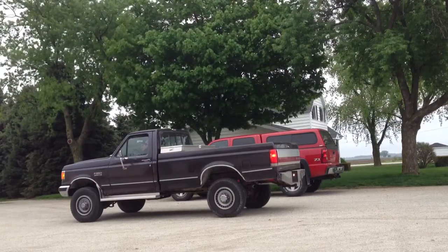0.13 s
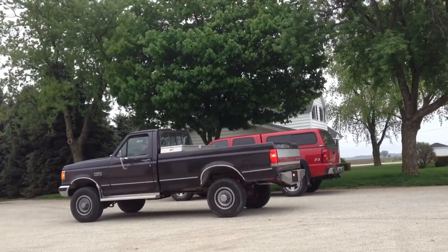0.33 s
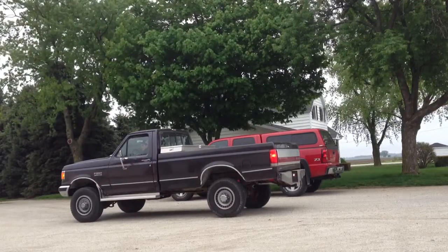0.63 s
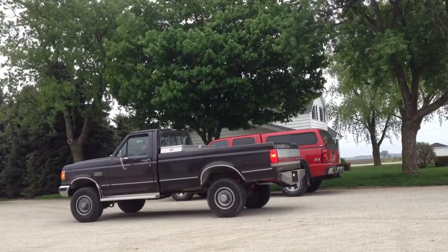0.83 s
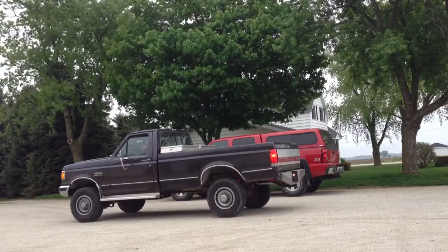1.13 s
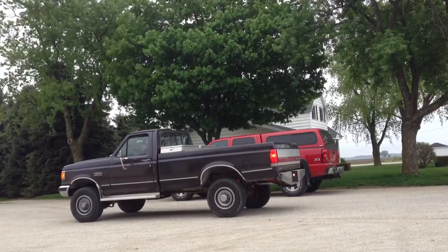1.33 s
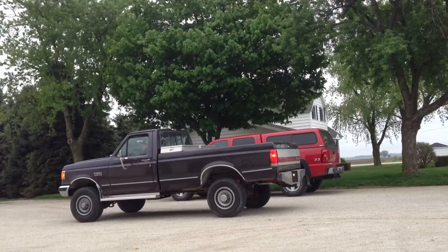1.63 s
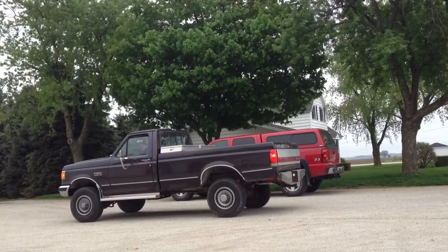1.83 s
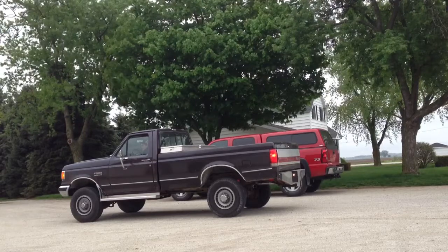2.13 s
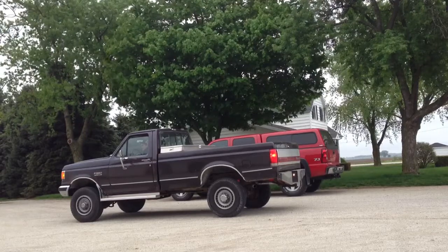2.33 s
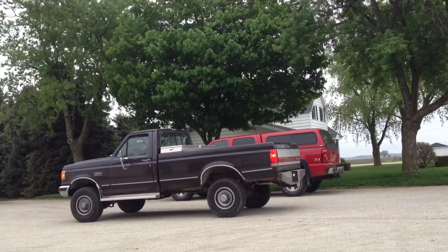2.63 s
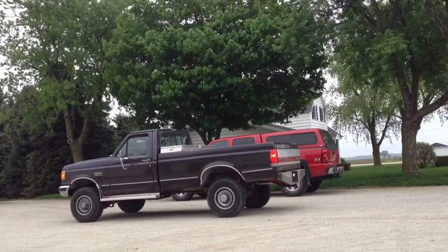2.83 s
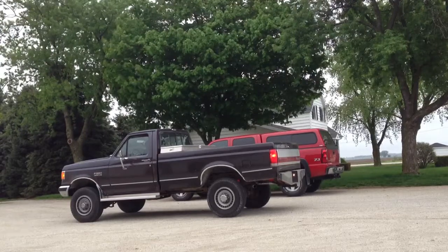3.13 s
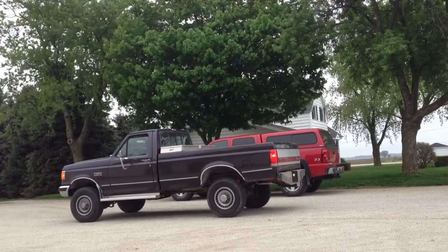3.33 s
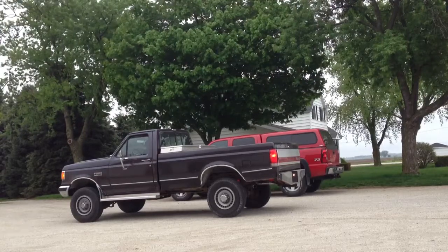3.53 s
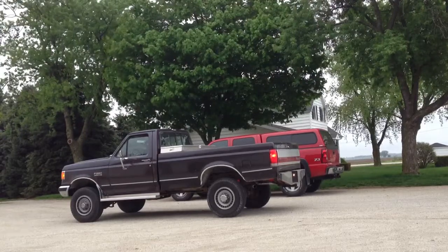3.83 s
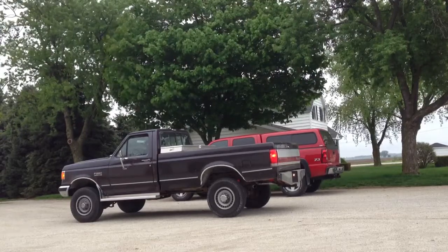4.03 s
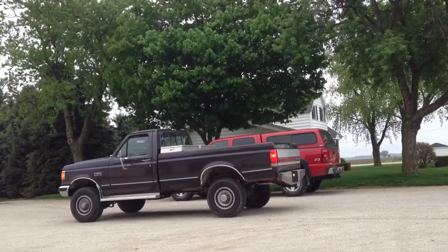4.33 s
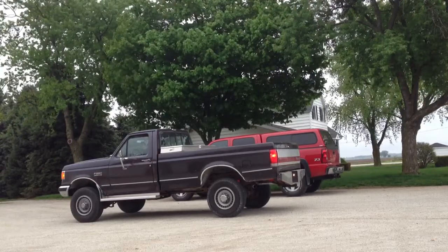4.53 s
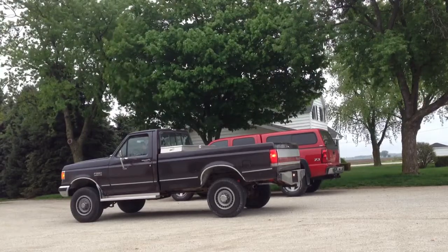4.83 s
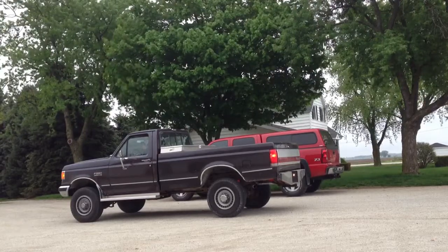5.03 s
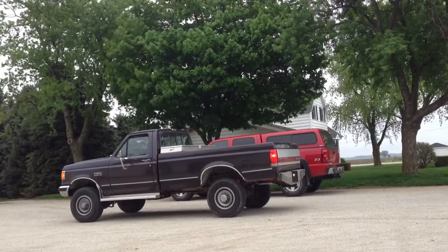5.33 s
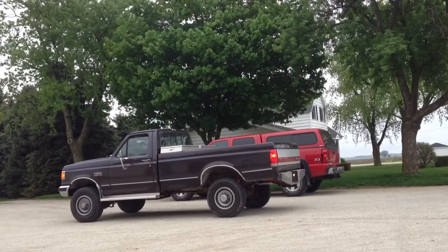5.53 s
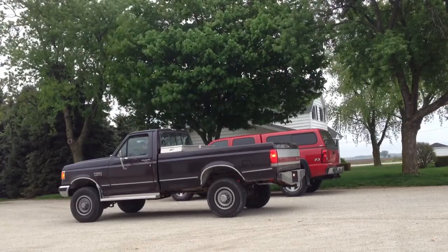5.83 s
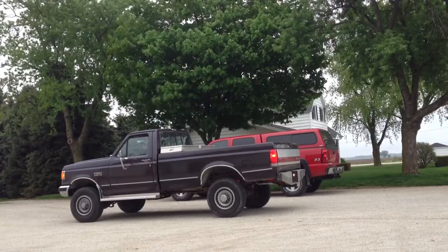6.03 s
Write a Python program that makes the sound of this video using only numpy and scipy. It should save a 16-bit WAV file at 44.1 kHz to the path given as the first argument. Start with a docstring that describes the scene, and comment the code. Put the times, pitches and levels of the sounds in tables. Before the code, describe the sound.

Outdoors on a gravel drive, a parked pickup's V8 with unmuffled twin pipes starts in a rough, lumpy idle and is revved slowly upward. The thumps merge into a humming, barking roar with a tearing rasp at full throttle. It then runs down with rapid crackles and pops, sinking to a weak, sputtering idle before two abrupt blips. The microphone squashes the peaks; trees and a house return faint scatter.

```python
"""A parked pickup's V8 with open dual pipes idles unevenly and is revved slowly; each firing thumps through its pipe.
Then it is floored: low lines hum with the speed and wide throttle adds a tearing rasp.
As it runs down, the pipes crackle and sputter, and late weak firings spit; two blips with a squeak end it.
Throughout, metal ticks, air hisses and a low rumble lies beneath; trees and a house answer faintly.
The microphone's limiter holds the peaks."""
import sys
import numpy as np
from scipy import signal
from scipy.fft import rfft, irfft, next_fast_len
from scipy.io import wavfile
from scipy.ndimage import uniform_filter1d, minimum_filter1d, map_coordinates

SR = 44100
rng = np.random.default_rng(int(sys.argv[2]) if len(sys.argv) > 2 else 0)


def to_wav(s):
    """Save 16-bit WAV."""
    ch = np.atleast_2d(s).T  # columns
    pcm = np.round(np.clip(ch, -1, 1) * 32767)  # PCM
    wavfile.write(sys.argv[1], SR, pcm.astype(np.int16))


N = 273420

# engine speed: (time [s], four-stroke cycles per second [Hz])
SPEED = [(0, 8.23), (0.55, 10.17), (1.3, 14.11), (1.8, 17.47), (2.25, 20.01), (2.44, 22.5), (2.56, 26.7),
         (2.69, 26.71), (2.95, 23.9), (3.3, 20.7), (3.75, 16.72), (4.4, 11.75), (5.53, 6.94), (5.83, 16.94),
         (6.06, 17.58), (6.2, 19.36)]
# how unevenly the fuel burns: (time [s], unevenness [0-1])
UNEVEN = [(0, 0.76), (.9, 0.5), (1.4, 0.25), (2.2, 0.25), (2.7, 0.35), (3.4, 0.5), (4.3, 0.62), (5.5, 0.7),
          (5.62, 0.5), (5.8, 0.45), (6.0, 0.65), (6.2, 0.6)]
# how hard the engine fires: (time [s], thump level before surges [dB])
EFFORT = [(0.0, -29), (0.17, -25.5), (0.59, -22.5), (0.82, -21), (1.1, -18), (1.33, -15), (1.43, -13.5),
          (1.59, -14), (2.02, -13), (2.07, -15.5), (2.4, -13), (2.56, -14.5), (2.95, -21.5), (4.13, -21),
          (4.85, -24.5), (5.28, -28.5), (5.49, -32.5), (5.61, -17.5), (5.85, -15), (5.99, -27), (6.04, -22),
          (6.09, -20), (6.2, -11)]
CRUISE_DB = -18  # the effort at which the bark, light rasp and fan have their set levels
# the pipe of each cylinder, in firing order: 0 or 1
BANK = (0, 1, 1, 0, 1, 0, 0, 1)
# colour of the thump: (frequency [Hz], filter gain [dB])
THUMP_COLOUR = [(25, -39), (60, -32), (85, -23), (110, -6.5), (140, -1), (200, -1.5), (260, -1.5),
                (320, -2), (380, -11.5), (480, -9.5), (700, -28), (1500, -60), (6000, -100)]
# colour of the bark, between thump and rasp: (frequency [Hz], filter gain [dB])
BARK_COLOUR = [(200, -31.5), (400, 4.5), (500, 0), (700, -3), (850, -7), (1100, -8), (1600, -17.5),
               (2500, -15), (8000, -95)]
# colour of bangs and spits: (frequency [Hz], filter gain [dB])
BANG_COLOUR = [(100, -11), (1000, -2), (1800, -6), (2600, -1), (3900, 1), (5300, -1), (6500, -.5),
               (8200, -10), (10700, -13.5), (15500, -28)]


def amp(db):
    """Decibels to gain."""
    return 10 ** (np.asarray(db) / 20)


def unit(x):
    """x at rms 1."""
    return x / np.sqrt(np.mean(x ** 2) + 1e-20)


def steady(x, size=8001):
    """x with its slow level held near rms 1."""
    power = uniform_filter1d(uniform_filter1d(x * x, size), size // 2)
    return x / np.sqrt(np.abs(power) + 1e-14)


def along(points, hz):
    """Read (frequency, value) points at hz, on a nearly logarithmic axis."""
    f, values = np.transpose(points)
    return np.interp(np.log(hz + 1), np.log(f + 1), values)


def curve(points):
    """Join (time, value) points by straight lines, one value per sample."""
    s, values = np.transpose(points)
    return np.interp(np.arange(N) / SR, s, values)


def filtered(x, response):
    """Multiply the spectrum of x by a response, which may be complex."""
    padded = 2 * next_fast_len(N // 2 + SR // 4)
    return irfft(rfft(x, padded) * response(np.fft.rfftfreq(padded, 1 / SR)), padded)[:N]


def coloured(x, colour, size=4096):
    """x through a filter of the given colour that never sounds ahead of its input (minimum phase)."""
    gain = amp(along(colour, np.fft.rfftfreq(size, 1 / SR)))
    # folding the cepstrum onto positive time makes the filter minimum phase
    cepstrum = irfft(np.log(gain))
    cepstrum[1:size // 2] *= 2
    cepstrum[size // 2 + 1:] = 0
    return signal.fftconvolve(x, irfft(np.exp(rfft(cepstrum))))[:N]


def strikes(at, sizes):
    """Add impulses of the given sizes at the given samples."""
    return np.bincount(at, sizes, N)[:N]


def dying(x, seconds):
    """Each impulse of x becomes an exponential decay, down to 1/e after the given seconds."""
    return signal.lfilter([1], [1, -np.exp(-1 / (seconds * SR))], x)


def split(x, hz):
    """The parts of x below and above hz."""
    low = filtered(x, lambda f: 1 / (1 + (f / hz) ** 8))
    return low, x - low


def wobble(rate):
    """A smooth random curve through rate random points a second."""
    points = rng.standard_normal(int(N * rate / SR) + 4)
    return map_coordinates(points, [np.arange(N) * rate / SR])


def patchy(x, depth_db):
    """Turbulence: small random patches of time and pitch grow louder or softer."""
    z = signal.stft(x, nperseg=256)[2]
    field = uniform_filter1d(rng.standard_normal(z.shape), size=6, axis=0)
    field = uniform_filter1d(field, size=5, axis=1)
    return signal.istft(z * amp(depth_db * unit(field)), nperseg=256)[1][:N]


def rings(rows, rise_s):
    """For each (time, pitch, peak dB) row, a tone that swells for rise_s and dies away."""
    s, hz, db = np.transpose(rows)[:, :, None]
    t = np.arange(int(10 * rise_s * SR)) / SR
    swell = (t / rise_s * np.exp(1 - t / rise_s)) ** 2
    waves = amp(db) * swell * np.sin(2 * np.pi * (hz * t + rng.random(s.shape)))
    at = (s * SR).astype(int) + np.arange(len(t))
    return strikes(at.ravel(), waves.ravel())


def coasting():
    """0 while the engine clearly gains speed, 1 while it holds or runs down, with short blends."""
    gaining = np.gradient(curve(SPEED)) * SR > .5  # cycles per second, per second
    return uniform_filter1d(1. - gaining, size=5000)


def pipe(x):
    """Standing waves in the pipes alter narrow bands; the set shifts at low revs and with the throttle shut."""
    # resonances while pulling: (frequency [Hz], width [Hz], boost [dB])
    pulling_modes = [(200, 45, 2), (300, 50, 3), (470, 60, 4), (590, 40, 2), (673, 35, 3), (836, 70, 7),
                     (1090, 60, 1.5), (1261, 45, 3)]
    # resonances with the throttle shut: (frequency [Hz], width [Hz], boost [dB])
    shut_modes = [(205, 60, -3), (280, 60, 2), (450, 55, 5.5), (604, 40, 2), (673, 35, 4), (830, 50, 6),
                  (1075, 50, 1), (1250, 55, 5)]

    def boost(f, hz, width, db):
        return 1 + (amp(db) - 1) * 1j * f * width / (hz * hz - f * f + 1j * f * width)

    def ring(modes):
        return filtered(x, lambda f: np.prod([boost(f, *mode) for mode in modes], axis=0))

    slow = np.interp(curve(SPEED), [11, 17], [1, 0])
    shut = np.maximum(coasting(), slow)
    return (1 - shut) * ring(pulling_modes) + shut * ring(shut_modes)


def yard(x, wet_db):
    """x plus the scatter from truck body, trees and house: noise whose treble dies soonest."""
    # time to fade by 60 dB: (frequency [Hz], time [s])
    fade_times = [(150, 1), (1000, 0.36), (4000, 0.18), (12000, 0.0033)]
    hz, t, z = signal.stft(rng.standard_normal(SR // 2), SR, nperseg=256)
    fade = amp(-60 * t / along(fade_times, hz)[:, None])
    tail = signal.istft(z * fade, SR, nperseg=256)[1]
    return x + amp(wet_db) * signal.fftconvolve(x, tail / np.linalg.norm(tail))[:N]


def firings(cycles, far_pipe_s=.0012, scatter_db=4.5, jitter_s=.0012):
    """Sample, thump size and rasp size of every firing; one bank's pulses tend to arrive later."""
    # in firing order, before the random scatter: (thump [dB], rasp [dB])
    cylinders = [(3, 4), (-2, -3), (-1, -2), (3, 3), (-2, -3), (-1, -2), (2, 1), (-3, -3)]
    at = np.flatnonzero(np.diff(np.floor(cycles * len(BANK))))
    cylinder = np.arange(len(at)) % len(BANK)
    uneven = curve(UNEVEN)[at]
    chance = rng.standard_normal((len(at), 3))
    late = far_pipe_s * np.array(BANK)[cylinder] + jitter_s * uneven * chance[:, 0]
    scatter = scatter_db * uneven[:, None] * np.tanh(chance[:, 1:])
    sizes = amp(np.array(cylinders)[cylinder] + scatter)
    return np.clip(at + (late * SR).astype(int), 0, N - 1), *sizes.T


def stabs():
    """Gain of the wide-throttle rasp: the pipes tear open, sag while it lasts, and fall back."""
    # throttle stamped on: (time [s], rise [s], hold [s], fall [s], rasp before sag [dB], sag [dB/s])
    openings = [(2.193, 0.27, .85, .35, -22, 15), (5.483, 0.15, 0.25, .1, -21.5, 23),
                (6.104, 0.044, .1, .1, -22, 2)]
    t = np.arange(N) / SR
    gain = np.zeros(N)
    for s, rise, hold, fall, db, sag in openings:
        shape = np.interp(t, s + np.cumsum([0, rise, hold, fall]), [0, 1, 1, 0]) ** 2
        gain += shape * amp(db - sag * np.maximum(t - s - rise, 0))
    return gain


def levels(rasp_base_db=-39.5, bark_base_db=-28.5):
    """dB of thump, bark and rasp from effort, speed and throttle; the bases hold at cruise and mean speed."""
    # some firings burn harder or weaker: (time [s], half length to 1/e [s], bark change [dB])
    surges = [(1.917, 0.028, 7), (2.85, 0.09, 5.5), (3.08, 0.11, 1.5), (3.327, 0.095, 10),
              (3.652, 0.15, 6.5), (4.13, 0.15, 6), (6.044, 0.013, -5.5)]
    t = np.arange(N) / SR
    effort_db, speed_hz = curve(EFFORT), curve(SPEED)
    push_db = effort_db - CRUISE_DB
    surge_db = sum(db * np.exp(-((t - s) / half) ** 2) for s, half, db in surges)
    # light-throttle rasp gains 0.3 dB per dB of effort and 2.5 dB per octave of speed
    light_db = rasp_base_db + 0.3 * push_db + 2.5 * np.log2(speed_hz / speed_hz.mean())
    rasp_db = 20 * np.log10(np.hypot(amp(light_db), stabs()))
    # the bark follows both the effort and the rasp
    bark_db = bark_base_db + 0.77 * push_db + 0.35 * (rasp_db - rasp_base_db)
    # thump and rasp take only a share of each surge
    return effort_db + .45 * surge_db, bark_db + surge_db, rasp_db + .5 * surge_db


def hum(cycles, waver_db=1.4, waver_turns=.018, waver_rate=22):
    """Orders (whole multiples of the cycle rate) glide as wavering lines, swelling at the pipes' standing waves."""
    # (order, loudest at [Hz], half width [octaves], relative level pulling [dB], the same running down [dB])
    swells = [(5, 124, .12, -16, -10), (6, 124, .2, -25, -14), (8, 122, .11, -10, -10),
              (8, 160, .08, -3.5, -4.5), (8, 200, .17, -19, -7.5), (9, 162, .1, -12, -11),
              (9, 198, .13, -1.5, -20), (9, 234, .08, -1.5, -13), (10, 170, .25, -14, -18),
              (11, 156, .2, -10, -10), (11, 200, .08, -4, -8), (11, 285, .11, -13, -9),
              (12, 305, .1, -7, -16), (13, 143, .13, -8, -13), (13, 197, .14, -.5, -12),
              (14, 252, .06, -8, -11), (15, 220, .07, -9, -16), (16, 200, .12, -7, -14),
              (16, 295, .11, -6.5, -14), (18, 205, .17, -8, -13)]
    even_db, smear_db = 3.6, 16  # lines over the effort if burning evenly; loss if wholly uneven
    shut_uneven = .14  # the unevenness that counts on the overrun
    speed_hz, shut = curve(SPEED), coasting()
    lines = np.zeros(N)
    for k in sorted({row[0] for row in swells}):
        swell = np.zeros(N)
        for order, hz, width, pull_db, coast_db in swells:
            if order == k:
                octaves = np.log2(k * speed_hz / hz)
                swell += amp(pull_db + shut * (coast_db - pull_db)) * np.exp(-(octaves / width) ** 2 / 2)
        phase = k * cycles + rng.random() + waver_turns * wobble(waver_rate)
        waver = amp(waver_db * (1 - shut / 2) * wobble(waver_rate))
        lines += swell * waver * np.sin(2 * np.pi * phase)
    uneven = (1 - shut) * curve(UNEVEN) + shut * shut_uneven
    return np.sqrt(2) * amp(curve(EFFORT) + even_db - smear_db * uneven) * lines


def exhaust(cycles, merge_db=-6, bright_per_octave_db=3):
    """Every firing is a pressure pulse followed by a puff of turbulent gas."""
    # colour of the rasp: (frequency [Hz], filter gain [dB])
    rasp_colour = [(300, -40), (750, -7), (1300, -3.5), (1800, -4.5), (2400, -1), (3000, 2.5), (3900, 2),
                   (5000, -3), (6500, -2), (8200, -10.5), (10500, -14.5), (13000, -19.5), (15500, -30)]
    thump_db, bark_db, rasp_db = levels()
    speed_hz = curve(SPEED)
    at, push, tear = firings(cycles)
    # single pulses stand out at a lumpy idle and merge into the hum at speed
    pulses = curve(UNEVEN) * unit(strikes(at, push))

    def puffs(sizes, life_s):
        return unit(dying(strikes(at, sizes), life_s) * rng.standard_normal(N))

    # running down from high revs, the deepest part of the thump is left to the hum
    deep, upper = split(coloured(pulses + .3 * puffs(push, life_s=.005), THUMP_COLOUR), hz=210)
    merged = coasting() * np.interp(speed_hz, [11, 17], [0, 1])
    thump = yard(pipe(amp(merge_db * merged) * deep + upper), wet_db=-6)

    # the bark grows brighter with the revs
    dull, bright = split(coloured(pulses + .45 * puffs(push, life_s=.003), BARK_COLOUR), hz=950)
    brightness = amp(bright_per_octave_db * np.log2(speed_hz / speed_hz.mean()))
    bark = yard(pipe(dull + brightness * bright), wet_db=-7)

    # long soft puffs at light throttle, short tearing ones when it is wide open
    wide = np.clip(stabs() / amp(rasp_db), 0, 1)
    gas = wide * puffs(tear, life_s=.0036) + np.sqrt(1 - wide ** 2) * puffs(tear, life_s=.011)
    rasp = patchy(yard(coloured(gas, rasp_colour), wet_db=-7), depth_db=1.6)

    # the clean lines carry part of the low power; the pulses carry the rest, at least a quarter
    lines = hum(cycles)
    low_power = amp(thump_db) ** 2
    rest = np.maximum(low_power - uniform_filter1d(lines ** 2, size=6000), .25 * low_power)
    low = np.sqrt(rest) * steady(thump) + lines
    return low + amp(bark_db) * steady(bark) + amp(rasp_db) * steady(rasp)


def clatter(cycles, pitch_hz=3100, spread=.19, life_s=.0008, level_db=-43, shut_db=-9):
    """Valves and loose metal tick at random in the engine bay, more often with speed, each at its own pitch."""
    # two ticks per firing on average
    at = np.flatnonzero(rng.random(N) < np.gradient(cycles) * 2 * len(BANK))
    chance = rng.standard_normal((len(at), 2))
    t = np.arange(SR // 60) / SR
    hz = pitch_hz * np.exp(spread * chance[:, :1])
    ticks = amp(3 * chance[:, 1:]) * np.sin(2 * np.pi * hz * t) * t * np.exp(-t / life_s)
    ticking = strikes((at[:, None] + np.arange(len(t))).ravel(), ticks.ravel())
    return amp(level_db + shut_db * coasting()) * unit(ticking)


def fan(cycles, level_db=-46, per_effort=0.028, shut_db=-2):
    """Air hisses through the radiator fan and the intake as coloured noise, louder with speed and effort."""
    # colour of the hiss: (frequency [Hz], filter gain [dB])
    air_colour = [(880, -32), (1500, 12.5), (1970, -2), (2240, 7.5), (3380, -1.5), (3910, 11.5),
                  (4660, 6.5), (7300, 1.5), (9230, -20), (15500, -22)]
    # the foot lifts and the intake falls quiet: (time [s], half length to 1/e [s], change [dB])
    s, half, db = (6.03, 0.096, -23)
    speed_hz = np.gradient(cycles) * SR
    draw_db = per_effort * (curve(EFFORT) - CRUISE_DB) + shut_db * coasting()
    draw_db += db * np.exp(-((np.arange(N) / SR - s) / half) ** 2)
    hiss = unit(coloured(rng.standard_normal(N), air_colour))
    return amp(level_db + draw_db) * (speed_hz / 10) ** .5 * hiss


def outdoors(level_db=-45):
    """A faint steady rumble under the engine, made of low noise."""
    # colour of the rumble: (frequency [Hz], filter gain [dB])
    rumble_colour = [(20, -14), (60, 2), (100, -7), (160, 21.5), (500, -32), (2000, -102)]
    return amp(level_db) * unit(coloured(rng.standard_normal(N), rumble_colour))


def lumps(boom_db=4, rise_s=.0055, thump_db=34, bark_db=21, life_s=.011, gas=.9):
    """Now and then one cylinder fires much harder: a pulse and a gush of gas that set the pipe booming."""
    # single heavy firings: (time [s], pitch of the boom [Hz], relative level [dB])
    heavy_firings = [(0.25, 190, -18), (0.303, 175, -16), (0.333, 175, -15), (0.515, 195, -15),
                     (0.608, 210, -11), (0.671, 195, -15), (0.762, 265, -14), (0.884, 200, -12),
                     (0.969, 210, -11), (1.0, 290, -16), (1.09, 175, -14), (1.18, 220, -13),
                     (1.213, 240, -20), (1.404, 195, -6), (1.699, 235, -16), (2.04, 220, -13),
                     (3.596, 215, -18), (3.734, 210, -17), (3.959, 230, -17), (3.987, 245, -17),
                     (4.1, 200, -17), (4.143, 195, -19), (4.168, 210, -16), (4.42, 180, -16),
                     (4.69, 180, -18), (4.867, 230, -20), (5.187, 180, -23), (5.66, 230, -13),
                     (5.773, 210, -11), (6.113, 190, -10)]
    s, _, db = np.transpose(heavy_firings)
    blows = strikes((s * SR).astype(int), amp(db))
    gust = np.sqrt(2 / (life_s * SR)) * dying(blows, life_s) * rng.standard_normal(N)
    blows = blows + gas * gust
    thump = amp(thump_db) * coloured(blows, THUMP_COLOUR)
    bark = amp(bark_db) * coloured(blows, BARK_COLOUR)
    return yard(amp(boom_db) * rings(heavy_firings, rise_s) + pipe(thump + bark), wet_db=-12)


def metal_ticks():
    """The clearest metal ticks are brief tones that swell and die."""
    # (time [s], pitch [Hz], peak of the swell [dB])
    clear_ticks = [(.286, 4800, -26), (.378, 4400, -26), (.403, 2500, -26), (.856, 3100, -26),
                   (5.527, 2050, -30)]
    return rings(clear_ticks, rise_s=0.0015)


def crackle(burst_s=.0012, snap_db=25.5, ring_db=6, ring_s=.0003, knock_db=17,
            tail_s=.008, tail=.3, delay_s=.0008):
    """Unburnt fuel bangs in the pipe: a tight bunch of steep shock fronts, then sizzling gas."""
    # bangs: (time before the delay [s], pitch of the ringing tone [Hz], relative level [dB])
    bangs = [(2.4703, 3200, -17), (2.4962, 3400, -17), (2.5122, 4600, -14), (2.5526, 3500, -13),
             (2.5905, 3900, -14), (2.6329, 4900, -16), (2.7053, 3300, -16), (2.7302, 3900, -15),
             (2.7686, 4000, -12), (2.7824, 3100, -17), (2.7974, 3600, -20), (2.8075, 4000, -13),
             (2.8469, 4300, -14), (2.8624, 4400, -18), (2.9282, 4000, -16), (2.9447, 5400, -18),
             (2.9706, 3600, -13), (2.9871, 5000, -17), (3.0131, 3400, -17), (3.056, 3100, -17),
             (3.0729, 4300, -18), (3.1004, 3900, -15), (3.1168, 4800, -13), (3.1448, 3100, -17),
             (3.1612, 4200, -15), (3.1734, 3400, -19), (3.1901, 3100, -15), (3.2066, 3300, -18),
             (3.237, 3500, -18), (3.2839, 3100, -20), (3.3243, 3900, -17), (3.3568, 3500, -17),
             (3.4067, 3400, -21), (3.458, 3900, -17), (3.491, 3700, -21), (3.5099, 2900, -23),
             (3.5982, 3100, -25), (3.6187, 5000, -26), (3.6541, 2400, -23), (3.7344, 6600, -27),
             (4.5506, 4800, -25), (5.6062, 3100, -15), (5.6186, 2900, -12), (5.6795, 3100, -13),
             (5.7084, 3300, -18), (5.7379, 3500, -18), (5.7534, 2900, -17), (5.8057, 3700, -15),
             (5.8666, 3800, -16), (6.1489, 3500, -14), (6.1844, 3300, -17)]
    s, hz, db = np.transpose(bangs)
    at = ((s + delay_s) * SR).astype(int)
    # each bunch is a fresh burst of noise, so it has its own colour
    t = np.arange(SR // 100) / SR
    bursts = rng.standard_normal((len(at), len(t))) * np.exp(-(t / burst_s) ** 4)
    bursts *= amp(db)[:, None] / np.linalg.norm(bursts, axis=1, keepdims=True)
    fronts = strikes((at[:, None] + np.arange(len(t))).ravel(), bursts.ravel())
    blows = strikes(at, amp(db))
    sizzle = tail * np.sqrt(2 / (tail_s * SR)) * dying(blows, tail_s) * rng.standard_normal(N)
    snap = amp(snap_db) * coloured(fronts + sizzle, BANG_COLOUR)
    ring = amp(ring_db) * rings(np.transpose([s + delay_s, hz, db]), ring_s)
    knock = amp(knock_db) * coloured(blows, BARK_COLOUR)
    return yard(snap + ring + knock, wet_db=-13)


def sputter(cycles, rise_s=0.0024, life_s=0.0079, level_db=-45):
    """With the throttle shut every firing leaves with a short hiss: noise that swells and dies."""
    # colour of the sputtering gas: (frequency [Hz], filter gain [dB])
    sputter_colour = [(800, -21), (2500, -22), (4000, 10), (5200, 5.5), (6800, 10.5), (8200, -4),
                      (11000, -6.5), (15500, -28)]
    at, _, sizes = firings(cycles)
    puffs = dying(dying(strikes(at, sizes), rise_s), life_s) * rng.standard_normal(N)
    hiss = steady(patchy(coloured(puffs, sputter_colour), depth_db=1))
    return amp(level_db) * coasting() * hiss


def spits(life_s=0.019, level_db=-9):
    """Weak firings at low revs only hiss out of the pipe as fading noise."""
    # soft spits of gas: (time [s], relative level [dB])
    soft_spits = [(4.377, -14.5), (4.495, -20), (4.925, -25), (4.961, -21), (5.075, -16.5), (5.548, -14.5),
                  (5.566, -12)]
    s, db = np.transpose(soft_spits)
    puffs = dying(strikes((s * SR).astype(int), amp(db)), life_s) * rng.standard_normal(N)
    return amp(level_db) * coloured(puffs, BANG_COLOUR)


def squeak(length_s=.0011):
    """A few milliseconds of whistle as the throttle snaps open: a tone under a bell-shaped swell."""
    # (time of the middle [s], pitch [Hz], peak of the swell [dB])
    s, hz, db = (5.578, 4700, -8)
    t = np.arange(N) / SR - s
    return amp(db) * np.exp(-(t / length_s) ** 2) * np.sin(2 * np.pi * hz * t)


def scene():
    """Engine cycles, counted up from the speed, pace the regular sounds; the single events have set times."""
    cycles = np.cumsum(curve(SPEED)) / SR
    pipes = exhaust(cycles) + lumps() + crackle() + sputter(cycles) + spits()
    engine_bay = clatter(cycles) + fan(cycles) + metal_ticks() + squeak()
    return (pipes + engine_bay + outdoors())[None]


def record(dry, ceiling=0.76, top_hz=15400):
    """The microphone's fast limiter turns the peaks down, then everything above top_hz is cut."""
    needed = np.minimum(1, ceiling / (np.abs(dry[0]) + 1e-9))
    gain = uniform_filter1d(minimum_filter1d(needed, size=121), size=121)
    return filtered(dry[0] * gain, lambda hz: hz < top_hz)[None]


dry = scene()
out = record(dry)
to_wav(out)
```